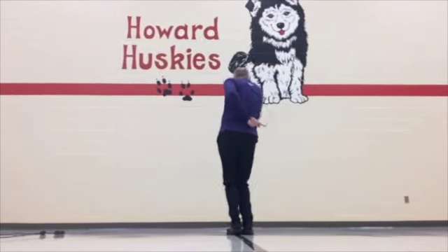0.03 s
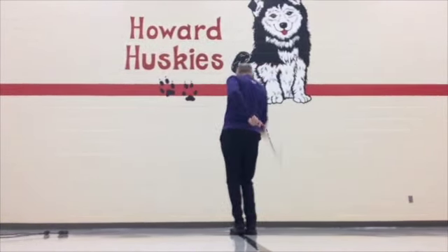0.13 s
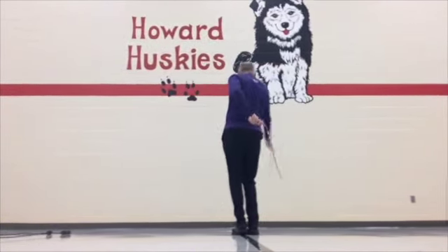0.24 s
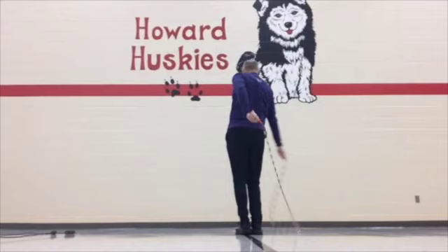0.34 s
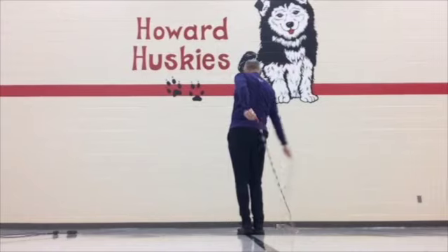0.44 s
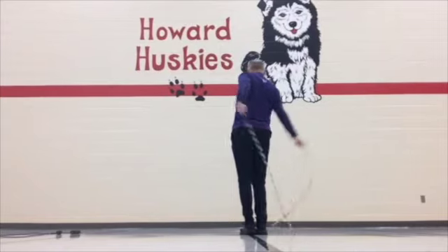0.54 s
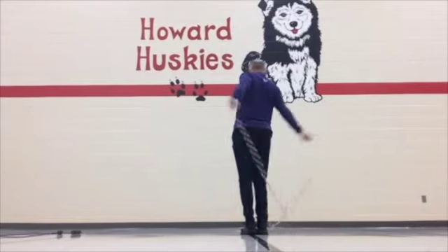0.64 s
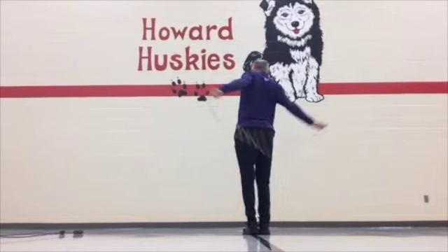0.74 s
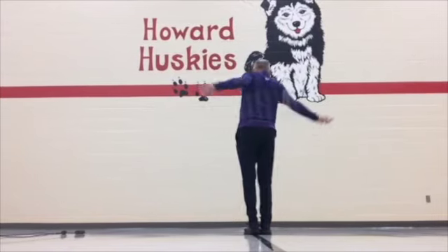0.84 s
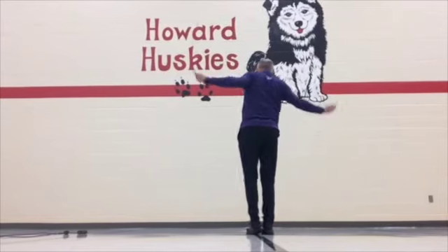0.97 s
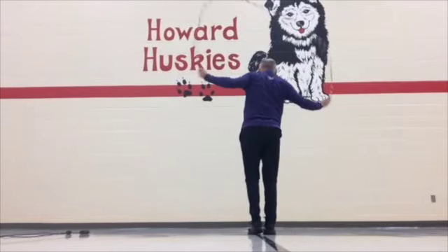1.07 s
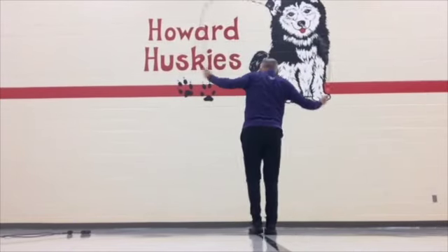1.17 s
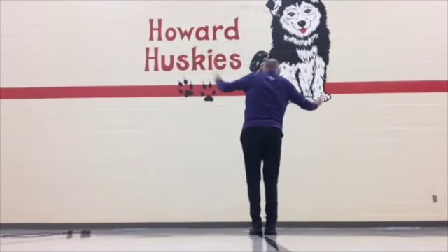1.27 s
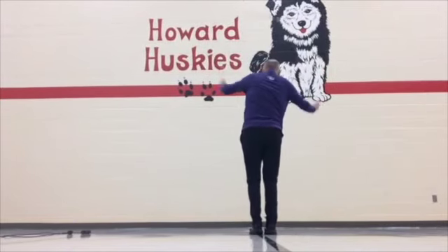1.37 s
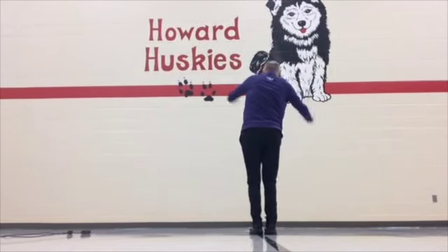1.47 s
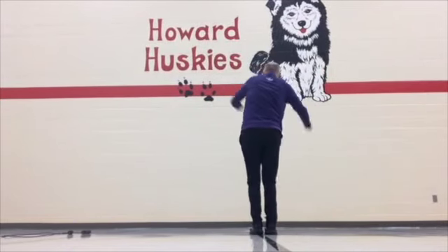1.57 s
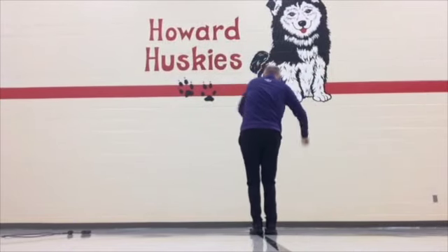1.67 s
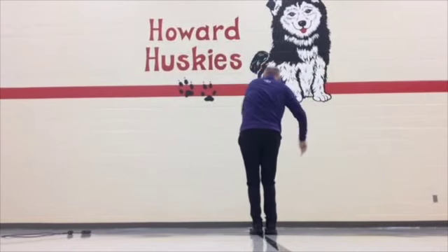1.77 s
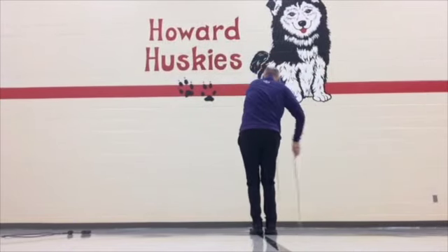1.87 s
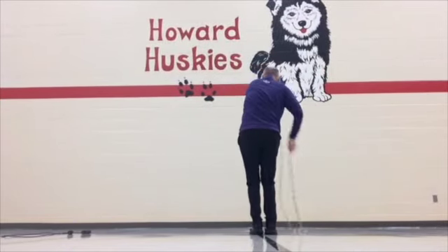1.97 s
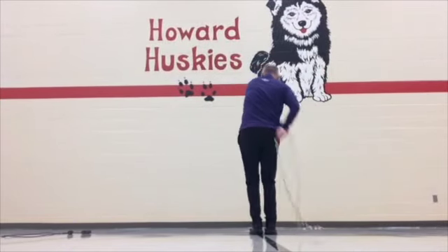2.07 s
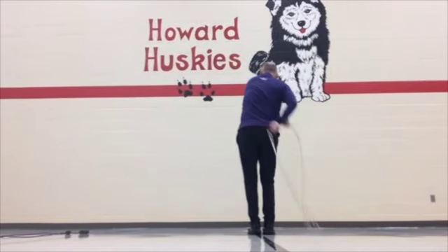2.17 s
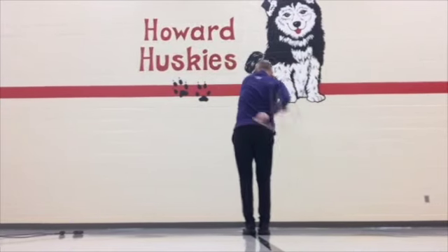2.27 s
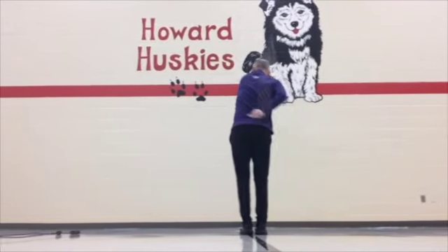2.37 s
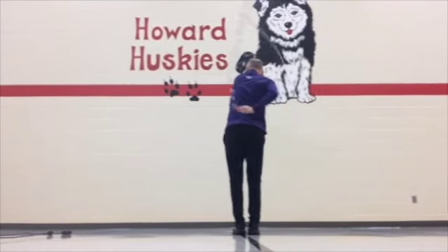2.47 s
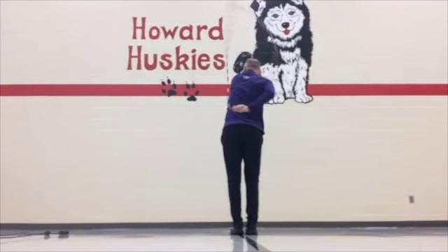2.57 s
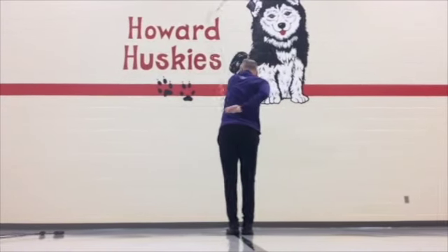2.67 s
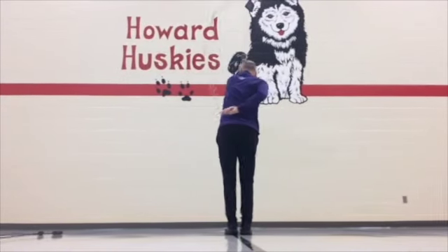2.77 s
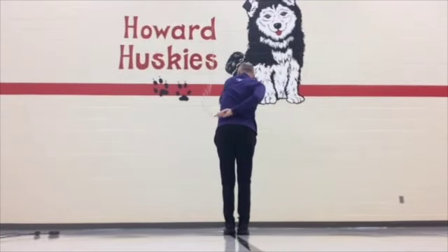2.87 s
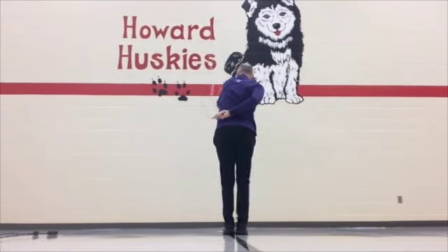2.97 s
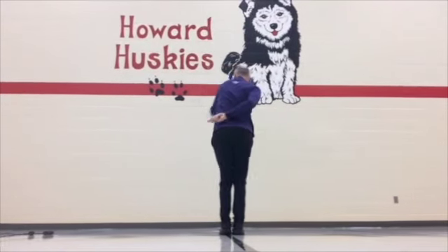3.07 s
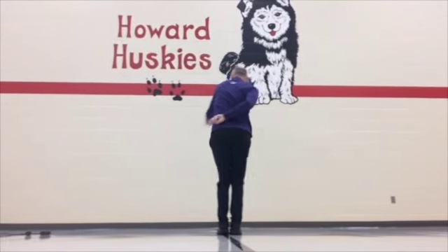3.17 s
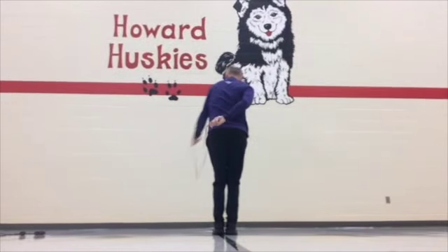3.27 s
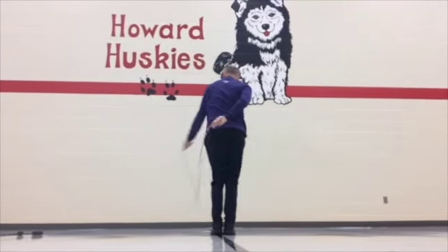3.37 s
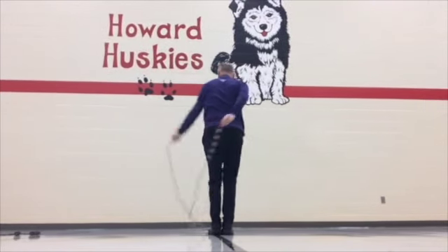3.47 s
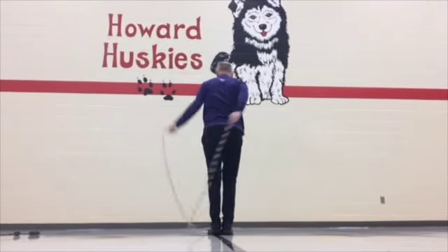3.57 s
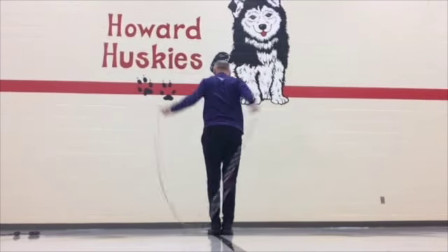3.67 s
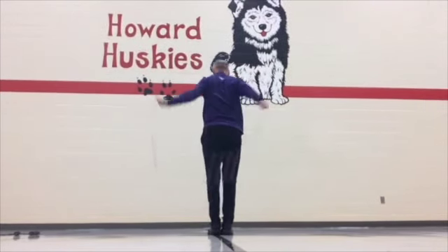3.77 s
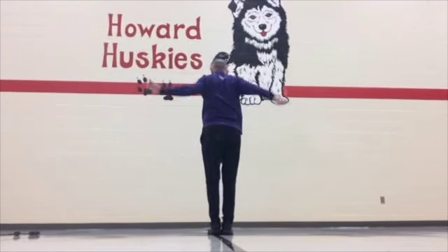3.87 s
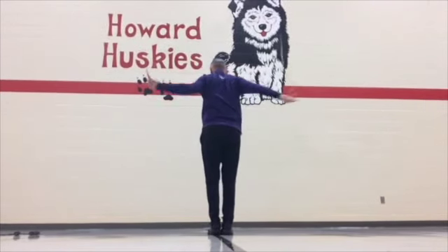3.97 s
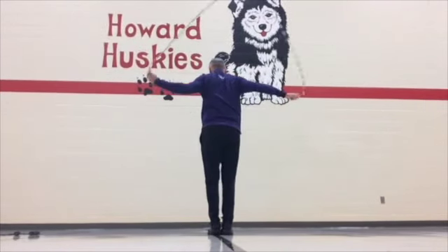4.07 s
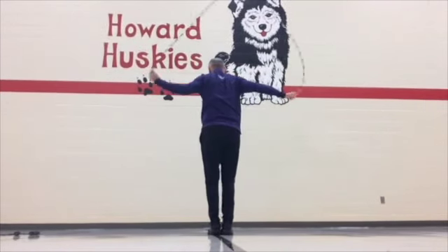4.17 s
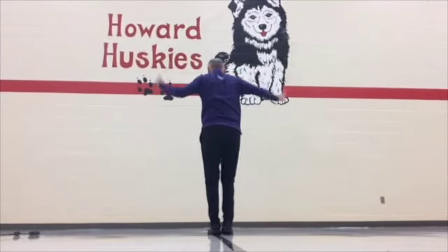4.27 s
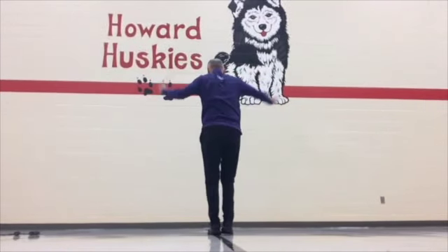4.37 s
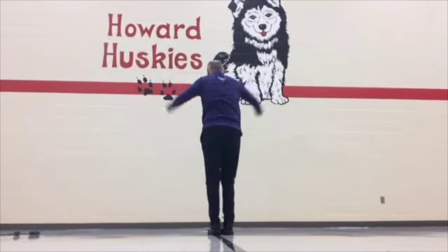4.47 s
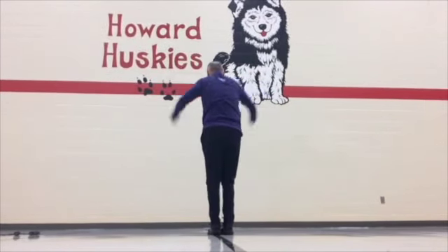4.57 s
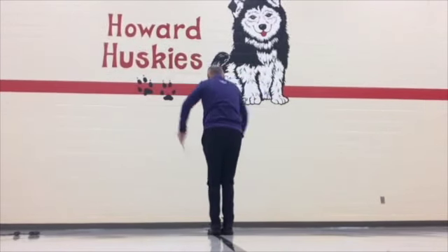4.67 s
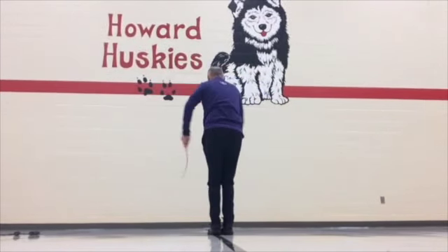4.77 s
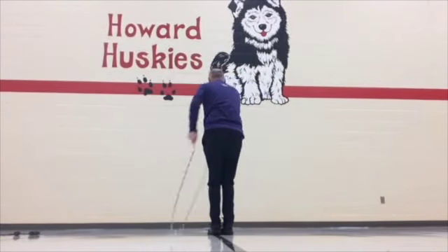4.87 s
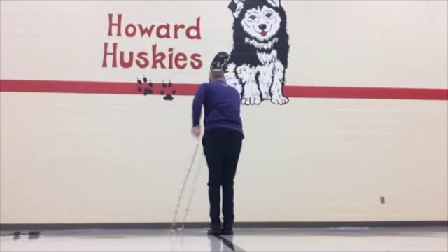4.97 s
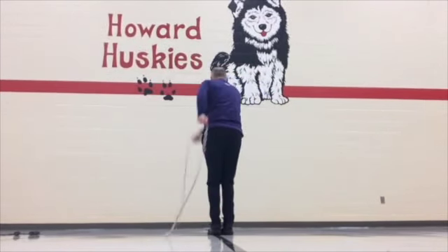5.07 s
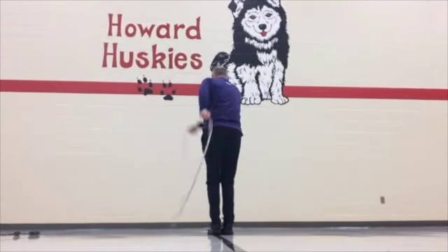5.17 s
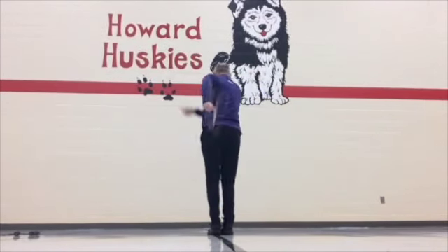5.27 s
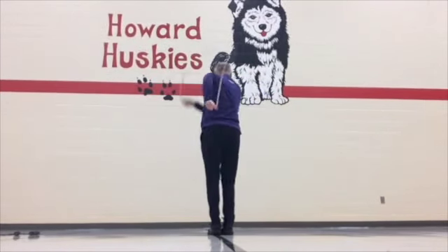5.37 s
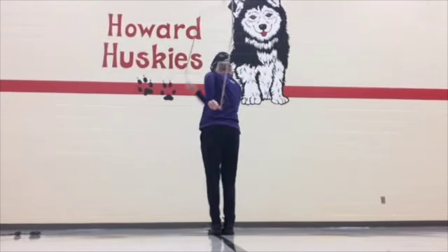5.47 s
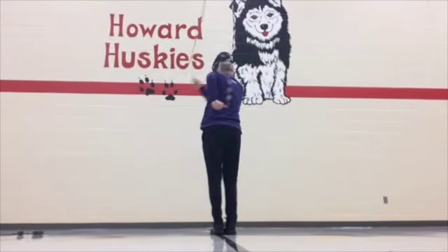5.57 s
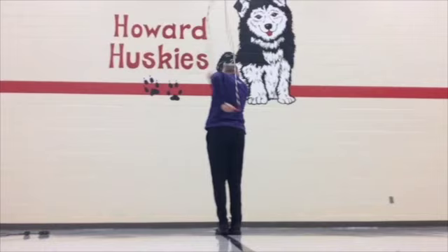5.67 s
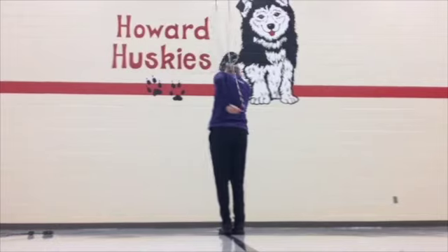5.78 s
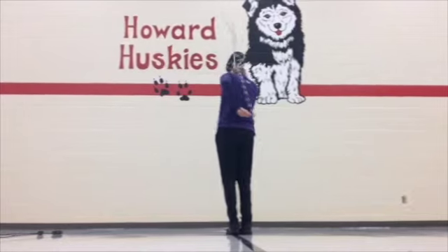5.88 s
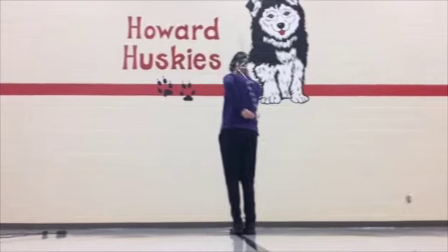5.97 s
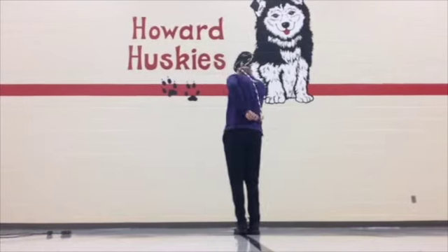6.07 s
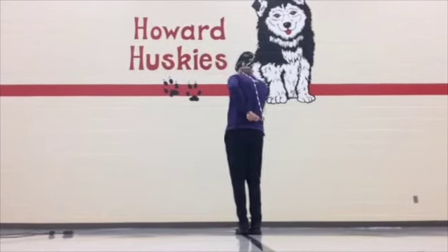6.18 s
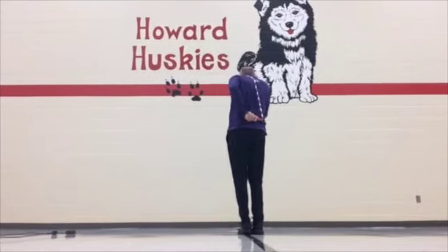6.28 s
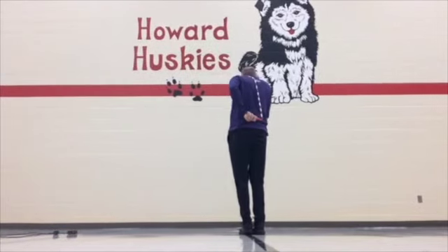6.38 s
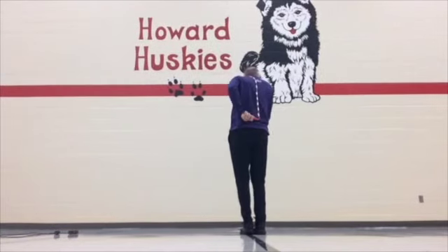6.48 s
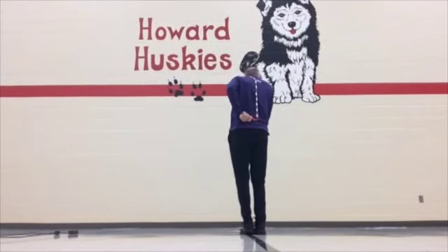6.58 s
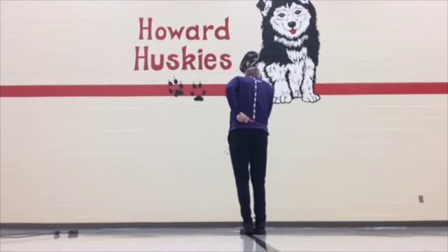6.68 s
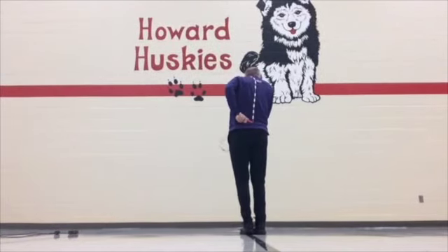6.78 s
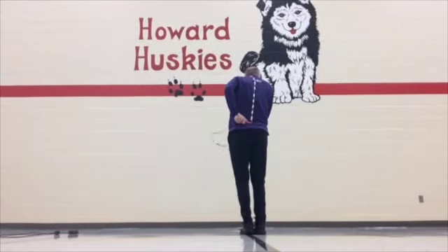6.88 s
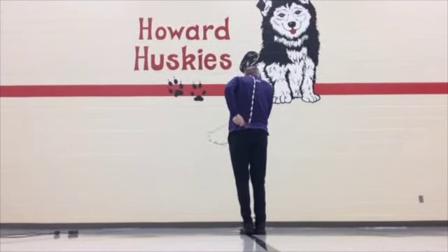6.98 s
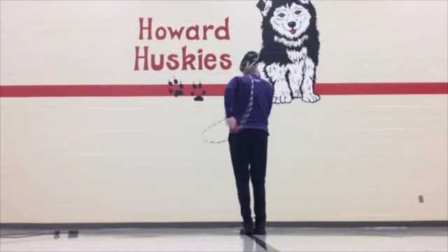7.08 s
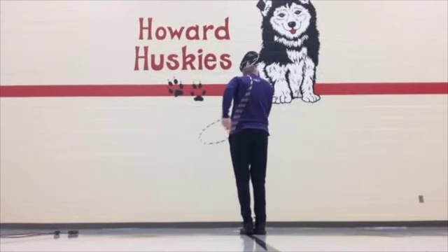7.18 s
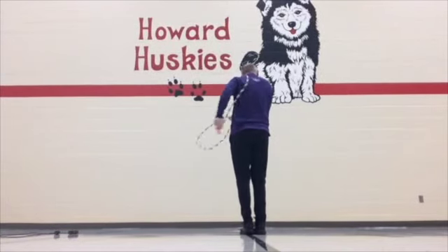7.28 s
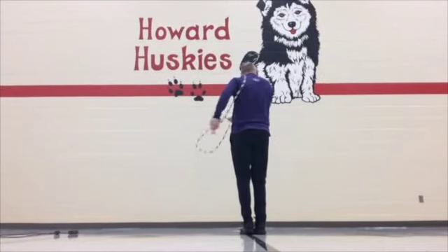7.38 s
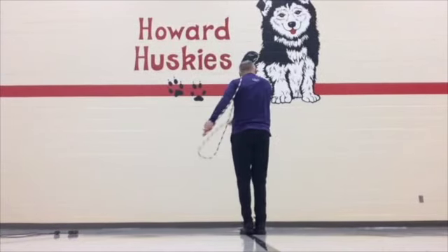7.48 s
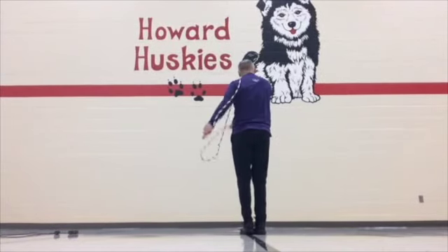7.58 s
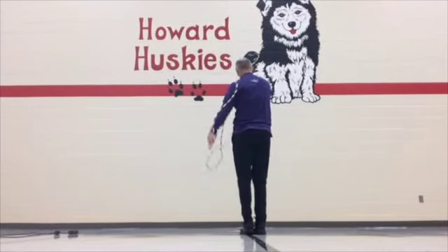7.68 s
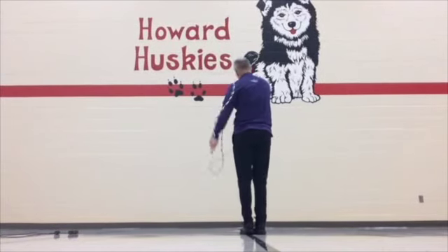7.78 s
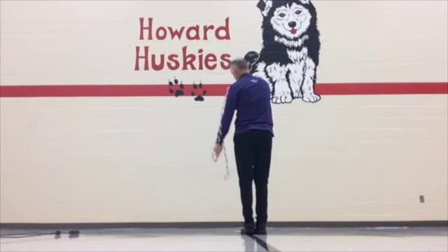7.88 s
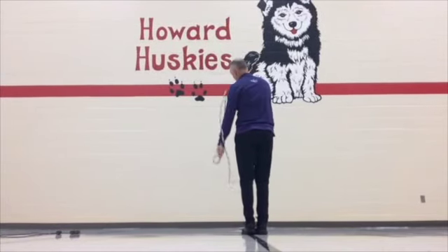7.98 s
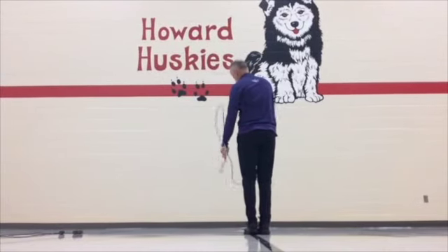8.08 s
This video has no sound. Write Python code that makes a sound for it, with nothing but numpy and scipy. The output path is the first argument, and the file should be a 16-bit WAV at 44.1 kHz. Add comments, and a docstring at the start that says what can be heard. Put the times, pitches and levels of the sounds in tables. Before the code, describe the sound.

Four slow, sharp plastic-bead slaps ring in a big gym, with clothing rubs and soft swishes between, then a heavy bump close up.

```python
"""A beaded skipping rope in a big gym, over clothing rumble, quiet ventilation and a hall still ringing.
From 0.5 s the rope slaps the floor about every 1.5 s, four times, each a rattle of noise-burst contacts
with a far-wall echo and a fading hall ring. Beads rattle overhead at 1.2 s; short resonances tick from 2.2 s.
Swings swish as shaped noise, and the body-worn microphone takes cloth tugs and low sine bumps throughout.
At 6.7 s the rope lands on the body and one bump right on the microphone drives its limiter."""
import sys
import numpy as np
from scipy import signal
from scipy.fft import rfft, irfft, next_fast_len
from scipy.io import wavfile
from scipy.ndimage import uniform_filter1d, minimum_filter1d, map_coordinates

SR = 44100
rng = np.random.default_rng(int(sys.argv[2]) if len(sys.argv) > 2 else 0)


def int16_out(signal):
    """Quantize to a 16-bit WAV file."""
    q = np.round(np.clip(np.atleast_2d(signal).T, -1, 1) * 32767)
    wavfile.write(sys.argv[1], SR, q.astype(np.int16))


N = 358516
TIME = np.arange(N) / SR

# the rope lays itself down, four times on the floor and last on the body; loose-bead levels before trim:
# [start t/s, length t/s, loose clack level/dB, loose knock level/dB, knock brightness dB per octave,
#  knock pitch f/Hz, its boost/dB, clack pitch f/Hz, its boost/dB, far-wall echo level/dB]
LANDINGS = [(0.477, .05, -33, -40, 3.5, 800, 8, 3040, 9, -38),
            (2.045, 0.055, -21.5, -22.5, -2.5, 480, 6.5, 1900, 3.5, -43.5),
            (3.605, .075, -30.5, -30, 0, 470, 2, 1900, 4.5, -58),
            (4.998, .06, -16.5, -19.5, -.5, 1180, 5, 3400, 6, -29.5),
            (6.677, .04, -37.5, -37, 2.5, 903, 9, 2004, 4, -65)]
# hard strokes within the landings, before trim: [t/s, clack level/dB, knock level/dB, length t/s]
STROKES = [(0.4805, -17, -22.5, 0.0018), (0.4931, -14.5, -16.5, 0.0018), (0.497, -6.5, -18, .0006),
           (0.5163, -24.5, -25, 0.0015), (2.046, -19, -25.5, 0.0017), (2.0513, -8, -22, 0.0008),
           (2.067, -23, -24.5, 0.0016), (2.093, -27, -23, 0.0022), (3.61, -27.5, -35, 0.0016),
           (3.622, -24, -27, 0.0016), (3.639, -25.5, -19.5, 0.0012), (3.648, -26, -15, 0.0023),
           (5.0067, -13, -12, 0.0025), (5.0126, -10.5, -8.5, 0.0016), (5.0302, -9, -11, .0016),
           (5.0384, -9.5, -11, 0.0022), (6.6742, -25.5, -13, 0.00064), (6.677, -21, -13, 0.0007)]
# relative spectrum of the hard plastic clack: [f/Hz, level/dB]
CLACK_COLOUR = [(300, -33.5), (800, -13), (1300, -13), (1600, 2.5), (1900, -0.5), (2350, -4.5), (3050, -5),
                (3500, -8.5), (4100, -16), (4900, -13.5), (5600, -27), (6300, -35), (8000, -56)]
# relative spectrum of the duller knock, before its tilt: [f/Hz, level/dB]
KNOCK_COLOUR = [(60, -15.5), (200, -10), (380, 0), (600, -6), (800, -1.5), (980, -5), (1170, -0.5),
                (1500, -10.5), (2500, -30), (6000, -58)]
BEADS_PER_S, BEAD_S, BEAD_SCATTER_DB = 140, 0.002, 2  # loose beads: rate, contact length, spread of level
BEAD_TAPER_DB = 5.5  # how much softer loose beads fall at the edges of a landing
WALL_DELAY_S = .085  # the echo's lag after a landing starts


def slaps(clack_trim_db=14, knock_trim_db=14, jitter=.3):
    """Each landing is a few hard strokes amid an uneven patter of loose beads; the far wall answers it."""
    out = np.zeros(N)
    for (start, span, loose_clack, loose_knock, bright, knock_hz, knock_boost_db,
         clack_hz, clack_boost_db, echo_db) in LANDINGS:
        clack_colour = spot(CLACK_COLOUR, clack_hz, clack_boost_db)
        knock_colour = spot(KNOCK_COLOUR, knock_hz, knock_boost_db, bright)
        strokes = [row for row in STROKES if abs(row[0] - start) < .5]
        late, stray = rng.standard_normal((round(span * BEADS_PER_S) - 1, 2)).T
        # jitter is a share of the mean gap between beads
        age = (np.arange(1, len(late) + 1) + jitter * late) / BEADS_PER_S
        # the patter is strongest in the middle of the landing
        force_db = BEAD_SCATTER_DB * stray - BEAD_TAPER_DB * (2 * age / span - 1) ** 2
        loose = [(start + s, loose_clack + db, loose_knock + db, BEAD_S) for s, db in zip(age, force_db)]
        for s, clack, knock, length in strokes + loose:
            burst = contact(clack_trim_db + clack, knock_trim_db + knock, length, (clack_colour, knock_colour))
            add(out, s, burst)
        add(out, start + WALL_DELAY_S, amp(echo_db) * echo())
    return out


def contact(clack_db, knock_db, length, colours, spiky=0.44, rattle_db=-20, rattle_t60=0.069, snap_s=.0004):
    """A quick run of beads that swells and dies: a hard plastic clack and a duller knock."""
    t = np.arange(SR // 8) / SR
    u, out = t / length, np.zeros(len(t))
    main_run = u * np.exp(1 - u)
    after_rattle = amp(rattle_db - 60 * t / rattle_t60) * (1 - np.exp(-u))
    run = main_run + after_rattle
    for colour, db in zip(colours, (clack_db, knock_db)):
        beads = run * rng.standard_normal(len(t)) * np.exp(spiky * rng.standard_normal(len(t)))
        # the shorter the contact, the more its beads land as one snap
        beads[np.argmax(run)] += np.linalg.norm(beads) * snap_s / length
        burst = ring(beads, colour)
        out += amp(db) * burst / np.linalg.norm(burst)
    return out


def spot(colour, pitch_hz, boost_db, bright=0, width_octaves=0.15):
    """A colour tilted about a pitch by bright dB per octave, with one resonance standing out there."""
    hz = np.geomspace(60, 8000, 160)
    octaves = np.log2(hz / pitch_hz)
    resonance_db = boost_db * np.exp(-(octaves / width_octaves) ** 2)
    return np.column_stack([hz, along(colour, hz) + bright * octaves + resonance_db])


# relative spectrum of the clack as wall and hall return it: [f/Hz, level/dB]
HALL_CLACK_COLOUR = [(300, -26.5), (800, -8.5), (1200, -6), (1550, -0.5), (1950, -1.5), (2500, -2),
                     (3200, -1.5), (4000, -11.5), (4900, -11.5), (5700, -24), (6300, -44), (8000, -75.5)]
WALL_SMEAR_S = .01  # time for the echo to swell to its peak


def echo():
    """The far wall's answer: a smeared clack that swells and dies."""
    u = np.arange(SR // 4) / SR / WALL_SMEAR_S
    return u * np.exp(1 - u) * noise(HALL_CLACK_COLOUR, size=len(u))


# what each slap sends into the hall, which still rings from an earlier one; levels before build-up and decay:
# [t/s, clack level/dB, knock level/dB, build-up t/s, decay-time scale, strongest pitch f/Hz, its level/dB]
HALL_SENDS = [(-1.02, -42, -49.5, .07, 1.07, 1850, -48), (.498, -41.5, -55.5, .12, .82, 1850, -45),
              (2, -46, -55.5, 0.067, 1.43, 1800, -48.5), (3.5, -51, -49.5, 0.14, 1.37, 1400, -60),
              (5, -40.5, -46, 0.023, 1.05, 1180, -49.5)]
# relative spectrum of the knock in the hall: [f/Hz, level/dB]
HALL_KNOCK_COLOUR = [(60, -8.5), (200, 2.5), (400, 1.5), (600, -0.5), (800, -2.5), (1150, -6.5),
                     (1600, -14), (3000, -30.5), (6000, -60)]
# the hall's time to fall 60 dB, before each slap's scale: [f/Hz, t60 t/s]
HALL_DECAY = [(100, 0.88), (400, 4.4), (1000, 4.46), (2000, 3.77), (3500, 2.77), (6000, 3.02)]


def hall(delay=.01, peak_octaves=0.83):
    """After each slap the diffuse ring builds and fades, each frequency dying at its own speed."""
    out, t = np.zeros(N), np.arange(4 * SR) / SR
    for s, clack_db, knock_db, build, scale, peak_hz, peak_db in HALL_SENDS:
        # a hump falling 20 dB for every peak_octaves away from the strongest pitch
        peak = [(peak_hz * 2 ** (k * peak_octaves), -20 * abs(k)) for k in range(-4, 5)]
        layers = ((clack_db, HALL_CLACK_COLOUR), (knock_db, HALL_KNOCK_COLOUR), (peak_db, peak))
        wash = sum(amp(db) * noise(colour, size=len(t)) for db, colour in layers)
        hz, age, bins = signal.stft(wash, SR, nperseg=512)
        t60 = scale * along(HALL_DECAY, hz)[:, None]
        tail = signal.istft(bins * amp(-60 * age / t60), SR, nperseg=512)[1][:len(t)]
        add(out, s + delay, tail * (1 - np.exp(-t / build)))
    return out


# beads and handles tapping together, before tone and scrape balance: [t/s, level/dB, pitch f/Hz]
TICKS = [(2.212, -30, 1750), (2.33, -20.5, 1590), (3.4479, -36, 1100), (4.82, -41, 2540),
         (5.347, -27.5, 1509), (5.9309, -26, 990), (6.2845, -18, 1330), (6.295, -28.5, 1200),
         (7.069, -45.5, 1900), (7.8945, -46.5, 950)]
# relative spectrum of moving air, also the base of the tick's scrape: [f/Hz, level/dB]
AIR_COLOUR = [(150, -19.5), (400, -2.5), (700, 4), (1200, 0.5), (1800, -0.5), (3200, -10), (4100, -15),
              (5000, -22), (6300, -36), (8000, -67)]


def ticks(tone_db=-1, scrape_db=-16, t60=0.0094, scrape_t60=0.023, rise=0.000092):
    """A light tap rings one short resonance, with a little scrape after it."""
    out, t = np.zeros(N), np.arange(SR // 10) / SR
    for s, db, hz in TICKS:
        tone = amp(tone_db - 60 * t / t60) * np.sin(2 * np.pi * hz * t)
        scrape_colour = spot(AIR_COLOUR, hz, boost_db=9, bright=-1.5, width_octaves=.45)
        scrape = amp(scrape_db - 60 * t / scrape_t60) * noise(scrape_colour, size=len(t))
        add(out, s, amp(db) * (tone + scrape) * (1 - np.exp(-t / rise)))
    return out


# bumps on the microphone: [t/s, level/dB, starting pitch f/Hz, casing level/dB re bump, length t/s]
BUMPS = [(0.073, -32, 84, -5.5, 0.015), (0.493, -18, 71, -2.5, 0.0064), (3.562, -22.5, 66, -7.5, 0.035),
         (3.665, -24, 67, -26, 0.021), (5.2523, -17.5, 83, -29, 0.027), (6.6745, 0, 95.8, 1, .024),
         (7.115, -37, 83.7, -7, 0.029)]
# modes of the microphone's mount and casing, relative levels: [f/Hz, level/dB, t60 t/s]
CASING_MODES = [(156, -1, .04), (190, -5, .04), (228, -2, .04)]


def bumps(slowing=0.023, rise=0.001, sway_db=-15, sway_hz=64, sway_t60=0.15):
    """A bump shoves the microphone through a slowing cycle or two, knocks its casing and leaves it swaying."""
    out, t = np.zeros(N), np.arange(SR // 3) / SR
    for s, db, hz, casing_db, length in BUMPS:
        slowing_time = slowing * (1 - np.exp(-t / slowing))
        shove = np.exp(-(t / length) ** 2) * np.sin(2 * np.pi * hz * slowing_time)
        casing = sum(amp(casing_db + level - 60 * t / t60) * np.sin(2 * np.pi * f * t)
                     for f, level, t60 in CASING_MODES)
        sway = amp(sway_db - 60 * t / sway_t60) * np.sin(2 * np.pi * sway_hz * t)
        add(out, s, amp(db) * (shove + casing + sway) * (1 - np.exp(-t / rise)))
    return out


# how much the body moves, before the rumble and rub trims: [t/s, level/dB]
EFFORT = [(0.0, -50.5), (0.74, -48.5), (1.2, -54), (1.99, -52), (2.13, -48.5), (3.24, -48.5), (3.58, -42),
          (4.62, -48), (5.16, -44), (5.82, -46), (6.14, -50), (6.61, -51), (7.06, -53.5), (8.13, -53.5)]
# an arm pulls the clothing across the microphone, before trims:
# [peak t/s, rumble level/dB, rub level/dB, length t/s]
TUGS = [(0.154, -34, -48.5, 0.099), (0.708, -43, -49.5, .1), (1.451, -63, -52.5, .05),
        (2.02, -47.5, -49, 0.13), (2.315, -39.5, -48, 0.15), (2.863, -50, -50.5, 0.17),
        (3.622, -35, -57, 0.19), (4.207, -37.5, -48.5, 0.17), (4.938, -32.5, -66, .08),
        (5.249, -33, -44.5, 0.091), (5.425, -38, -63.5, 0.11), (5.7, -39.5, -40, .13),
        (5.936, -41.5, -46, .09), (6.321, -47.5, -50.5, 0.075), (6.45, -45, -65, 0.091),
        (6.8, -39.5, -58, 0.045)]
# relative spectrum of the cloth's low rumble: [f/Hz, level/dB]
RUMBLE_COLOUR = [(10, -14.5), (25, -3.5), (45, 1), (70, -3.5), (110, -12), (200, -29), (500, -73.5)]
# relative spectrum of the cloth's rub: [f/Hz, level/dB]
RUB_COLOUR = [(50, -22), (110, 3), (160, -0.5), (230, -5.5), (320, -10.5), (500, -17.5), (1000, -37),
              (4000, -65)]


def clothing(rumble_db=-1, rub_db=2.0, steady_rumble_db=0, steady_rub_db=-9, lumpy_db=1.5, catch_db=2.0):
    """Fabric shifts with effort and hard at each tug: a lumpy rumble and a rub that catches and lets go."""
    effort_db, = curves(EFFORT)
    rumble, rub = amp(effort_db + steady_rumble_db), amp(effort_db + steady_rub_db)
    for s, low_db, high_db, length in TUGS:
        pull = swell(s, length)
        rumble = np.hypot(rumble, amp(low_db) * pull)
        rub = np.hypot(rub, amp(high_db) * pull)
    low = rumble * amp(rumble_db + lumpy_db * wobble(22)) * noise(RUMBLE_COLOUR)
    high = rub * amp(rub_db + catch_db * wobble(45)) * noise(RUB_COLOUR)
    return low + high


RISE_SHARE = .8  # a movement's build-up as a share of its length


def swell(s, length):
    """The gain of a movement: it gathers smoothly to its peak at time s, then dies away."""
    u = (TIME - s) / length
    rise = np.exp(-(u / RISE_SHARE) ** 2)
    fall = 1 / np.cosh(np.clip(u * np.pi / 2, 0, 20))
    return np.where(u < 0, rise, fall)


# the rope swings past, levels before flutter: [peak t/s, level/dB, length t/s]
SWINGS = [(.13, -61, 0.2), (2.09, -55.5, .16), (3.006, -61, 0.25), (3.62, -54.5, 0.28), (4.195, -60, 0.57),
          (4.952, -60.5, .25), (5.779, -51, 0.38), (6.732, -58.5, .06), (7.1, -66.5, .35)]
# one rattle of beads through the air overhead, before its grain: [peak t/s, level/dB, length t/s]
RATTLE = (1.178, -45.5, .028)
# relative spectrum of beads sliding on the cord: [f/Hz, level/dB]
CORD_COLOUR = [(500, -37), (1300, -12), (1900, 2.5), (2300, -3), (3200, -13), (5000, -20), (6300, -31),
               (8000, -68)]


def swish(still_db=-75, flutter_db=1.5, grain_db=3):
    """Air rushes round rope and sleeves with each swing; once the beads rattle along the cord."""
    swing_power = sum((amp(db) * swell(s, length)) ** 2 for s, db, length in SWINGS)
    rush = np.sqrt(amp(still_db) ** 2 + swing_power)
    air = rush * amp(flutter_db * wobble(40)) * noise(AIR_COLOUR)
    s, db, length = RATTLE
    rattle_gain = amp(db + grain_db * wobble(150)) * np.exp(-np.abs(TIME - s) / length)
    return air + rattle_gain * noise(CORD_COLOUR)


# relative spectrum of the quiet ventilation: [f/Hz, level/dB]
VENTILATION_COLOUR = [(120, -28), (200, -3), (295, -13.5), (393, -12), (474, -17), (540, -15), (641, -13),
                      (1050, -18), (2450, -18), (4670, -26), (6230, -49.5), (8100, -85.5), (13700, -120)]


def ventilation(level_db=-69):
    """Steady air noise with a fixed colour."""
    return amp(level_db) * noise(VENTILATION_COLOUR)


def amp(db):
    """Decibels to gain."""
    return 10 ** (np.asarray(db) / 20)


def unit(x):
    """x at rms 1."""
    return x / np.sqrt(np.mean(x ** 2) + 1e-20)


def along(points, hz):
    """Read (f/Hz, value) points on a log frequency axis."""
    f, v = np.transpose(points)
    return np.interp(np.log(hz + 1), np.log(f + 1), v)


def curves(rows):
    """One value per sample for each column after the time."""
    s, *cols = np.transpose(rows)
    return [np.interp(TIME, s, c) for c in cols]


def wobble(rate):
    """A smooth random curve, rate knots a second."""
    knots = rng.standard_normal(int(N * rate / SR) + 4)
    return map_coordinates(knots, [TIME * rate])


def add(track, s, sound):
    """Mix a sound into the track from time s on, dropping what falls outside."""
    start = round(s * SR)
    part = sound[max(-start, 0):N - start]
    track[max(start, 0):][:len(part)] += part


def noise(spectrum, size=N):
    """Coloured noise of rms 1."""
    m = next_fast_len(size)
    gain = amp(along(spectrum, np.fft.rfftfreq(m, 1 / SR)))
    return unit(irfft(rfft(rng.standard_normal(m)) * gain, m)[:size])


def ring(x, spectrum, size=2048):
    """x through a causal body with this spectrum."""
    # folding the cepstrum forward gives the minimum-phase response
    cepstrum = irfft(np.log(amp(along(spectrum, np.fft.rfftfreq(size, 1 / SR)))))
    cepstrum[1:size // 2] *= 2
    cepstrum[size // 2 + 1:] = 0
    return signal.fftconvolve(x, irfft(np.exp(rfft(cepstrum))))[:len(x)]


def scene():
    """Rope, hall and clothing over quiet ventilation."""
    rope_and_hall = slaps() + hall() + ticks()
    at_microphone = bumps() + clothing() + swish()
    return (rope_and_hall + at_microphone + ventilation())[None]


LOOK_AHEAD_S = 0.0012  # how far each of the limiter's two gain windows reaches either way
TOP_HZ = 6500  # the input's band limit


def record(dry):
    """A fast limiter holds down overloads, and the input falls steeply above its band limit."""
    reach = round(LOOK_AHEAD_S * SR) * 2 + 1
    needed_gain = 1 / np.maximum(1, np.abs(dry) / .96)
    limited = dry * uniform_filter1d(minimum_filter1d(needed_gain, reach), reach)
    m = next_fast_len(N + SR // 2)
    lowpass = 1 / np.sqrt(1 + (np.fft.rfftfreq(m, 1 / SR) / TOP_HZ) ** 40)
    return irfft(rfft(limited, m) * lowpass, m)[..., :N]


dry = scene()
out = record(dry)
int16_out(out)
```